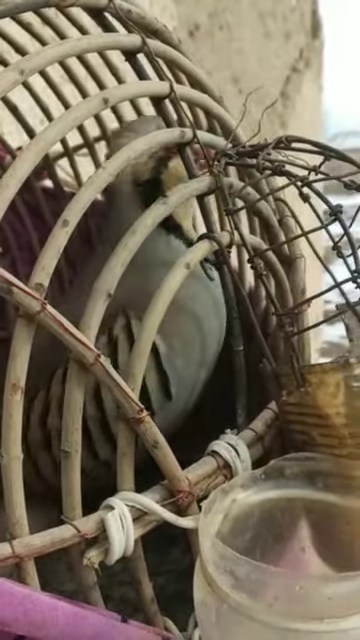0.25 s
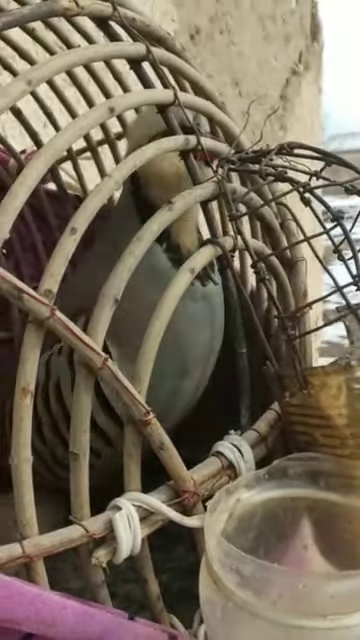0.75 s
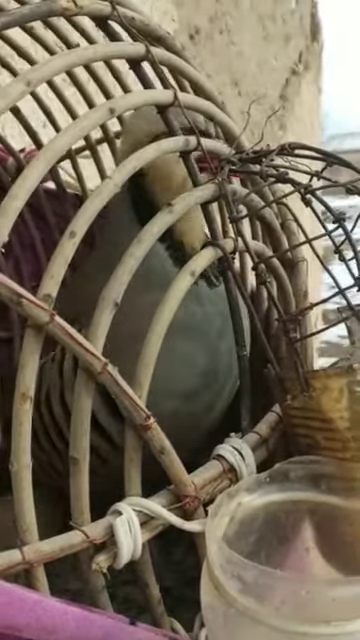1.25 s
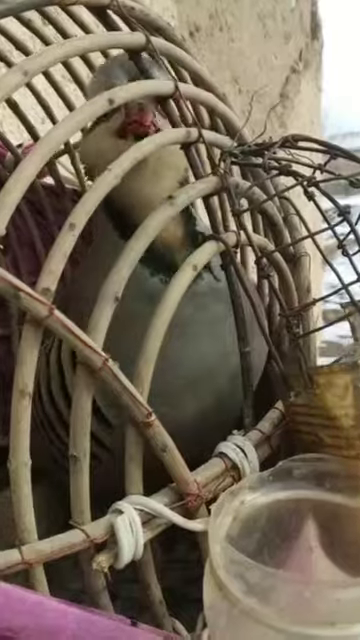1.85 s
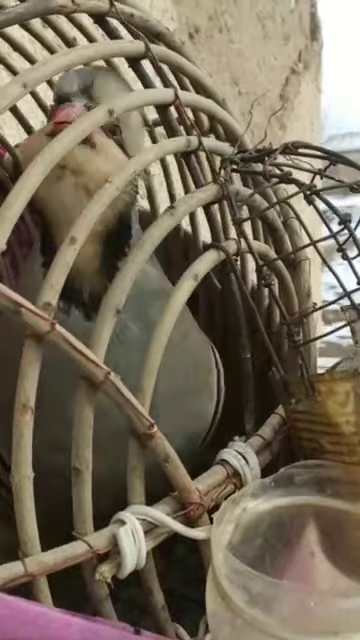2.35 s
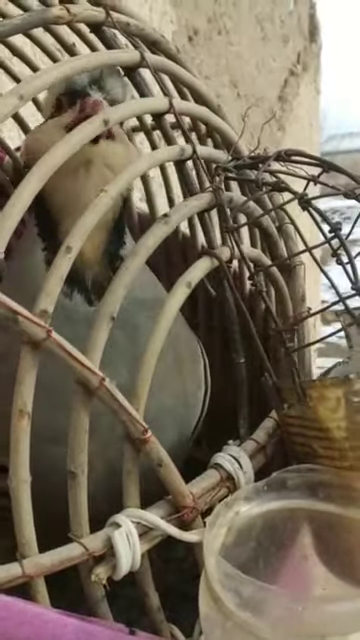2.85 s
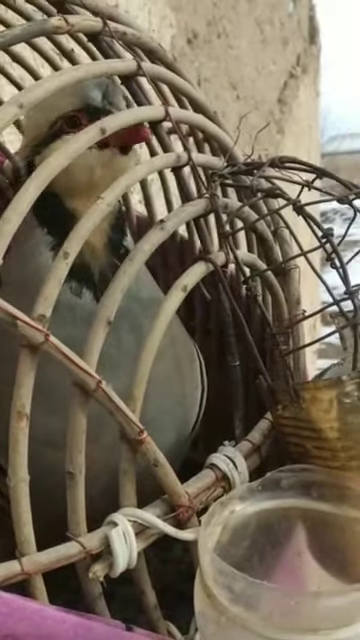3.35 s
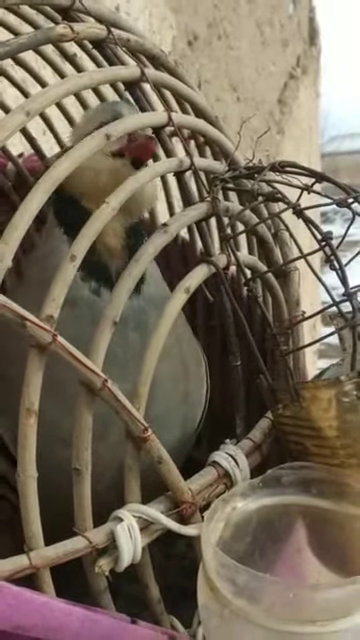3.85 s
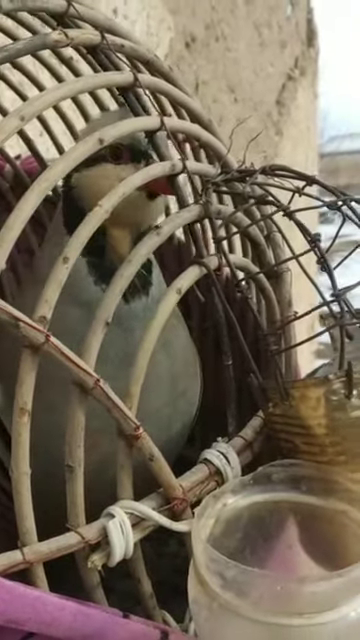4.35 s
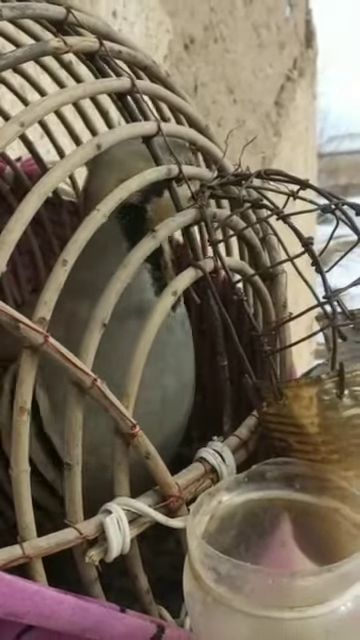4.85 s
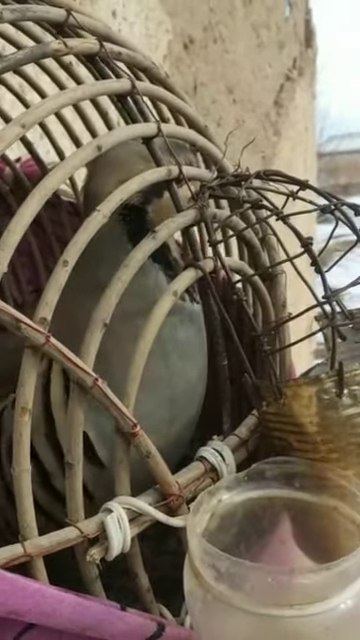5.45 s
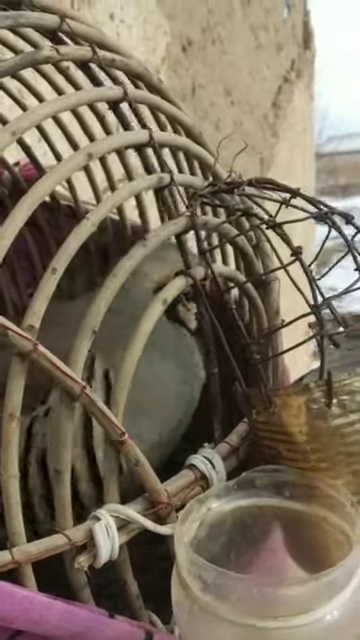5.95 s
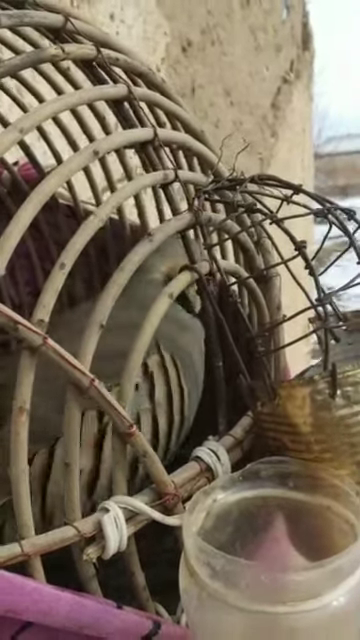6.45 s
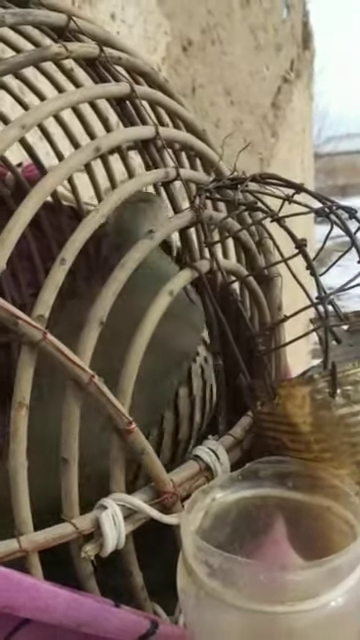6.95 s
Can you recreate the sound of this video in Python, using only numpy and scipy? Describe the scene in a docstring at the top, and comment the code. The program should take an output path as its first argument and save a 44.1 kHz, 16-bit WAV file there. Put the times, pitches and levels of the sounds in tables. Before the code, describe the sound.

Very close, a chukar partridge in a wicker cage rattles out quick hollow chucks in a galloping rhythm, with softer breathy murmurs between. After about three seconds the notes turn hoarse and sparser, then break upward into eight short, harsh, two-toned squeals, each dropping into an airy rasp. The later ones weaken slightly. Dry close stereo sound, faint yard echo, low quiet outdoor hush.

```python
"""Beside a wall outdoors, a chukar partridge calls in a wicker cage close to a pair of microphones.
A fast run of hollow chucks and soft murmurs turns into hoarse rasps, which break upward into
two-voiced squeals and then ease off. Uneven pulses and puffs through a moving throat resonance make
the single-voiced notes; two coupled tones make the squeals, gliding harmonics the faint whistles.
Scattered treble, a short tail and steady filtered noise make the cage, the yard and the outdoors."""
import sys
import numpy as np
from scipy import signal
from scipy.fft import rfft, irfft
from scipy.io import wavfile
from scipy.ndimage import uniform_filter1d, map_coordinates

SR = 44100
rng = np.random.default_rng(int(sys.argv[2]) if len(sys.argv) > 2 else 0)


def int16_out(signal):
    """Quantize to a 16-bit WAV file."""
    q = np.round(np.clip(np.atleast_2d(signal).T, -1, 1) * 32767)
    wavfile.write(sys.argv[1], SR, q.astype(np.int16))


N = 317520

EDGE_HZ = 15950  # upper band limit
BINS_HZ = np.fft.rfftfreq(2048, 1 / SR)

# Throat colour of tuks and chucks. Each row: frequency in Hz, gain in dB.
CHUCK_THROAT = [(200, -14), (330, -6.5), (500, -4.5), (900, -1), (1500, 1.5), (2300, -14.5), (2900, -12),
                (3550, -28), (4500, -13), (5500, -6), (6700, -30), (9500, -28.5), (12000, -28.5),
                (15500, -27.5)]
# Throat colour of rasps, also around squeals. Each row: frequency in Hz, gain in dB.
RASP_THROAT = [(200, -16), (330, -10), (500, -5), (900, -1.5), (1500, -5), (2300, -4), (2900, -1),
               (3600, -3), (4500, -6.5), (5500, -10), (6700, -14.5), (9500, -35), (12000, -34),
               (15500, -40)]
# Squeals. Each row: start in seconds, length in seconds, pitch the lower and the upper voice climb
# towards in Hz, level in dB, treble in dB, air in dB, lead-in in seconds, lead-in level in dB, tail level in dB.
SQUEALS = [(4.113, 0.058, 2000, 2875, -16.5, 3.5, -19, 0.02, -18, -21.5),
           (4.406, 0.073, 2044, 2920, -14, 4.5, -14, 0.024, -18.5, -20),
           (4.782, 0.068, 2197, 3163, -19, 6, -11, .014, -19.5, -24),
           (5.234, 0.085, 2045, 2960, -12.5, 7, -14.5, .013, -18.5, -21.5),
           (5.646, 0.063, 2142, 3080, -13, 9, -13, 0.014, -17, -22),
           (6.016, .108, 2357, 3295, -17, -11.5, 8, 0.0087, -24.5, -26),
           (6.463, 0.085, 2381, 3346, -17.5, -7, 1, 0.0083, -25, -28.5),
           (6.826, 0.08, 2464, 3370, -19, 14.5, -13.5, 0.0086, -21.5, -26)]


def amp(db):
    """Decibels to gain."""
    return 10 ** (np.asarray(db) / 20)


def evened(x):
    """Scales to rms 1."""
    return x / np.sqrt(np.mean(x ** 2) + 1e-20)


def read(points, hz):
    """Interpolates a spectrum on a log-frequency axis."""
    points_hz, value = np.transpose(points)
    return np.interp(np.log(hz + 1), np.log(points_hz + 1), value)


def contour(values, t):
    """Straight lines through values spread evenly over a note."""
    return np.interp(t, np.linspace(0, t[-1], len(values)), values)


def waver(t, cutoff_hz):
    """Random motion, low-passed at cutoff_hz; rms 1 over a quarter second, cut to the note."""
    hz = np.fft.rfftfreq(SR // 4, 1 / SR)
    spectrum = rfft(rng.standard_normal(SR // 4)) / (1 + (hz / cutoff_hz) ** 4)
    return evened(irfft(spectrum))[:len(t)]


def air_puffs(envelope):
    """Turbulent noise of rms 1, shaped by the airflow envelope."""
    return evened(envelope * rng.standard_normal(SR // 4)[:len(envelope)])


def add(mix, start_s, sound):
    """Lays a sound into the mix."""
    part = mix[max(round(start_s * SR), 0):][:len(sound)]
    part += sound[:len(part)]


def shelf(from_hz, to_hz):
    """Rises from 0 to 1 between two frequencies."""
    return np.interp(BINS_HZ, [from_hz, to_hz], [0, 1])


def resonance(centre_hz, width_hz):
    """One peak of height 1, down to half at width_hz from its centre."""
    return 1 / (1 + ((BINS_HZ - centre_hz) / width_hz) ** 2)


def tract(x, gain_db):
    """A causal minimum-phase filter with this gain, so that resonances ring after each pulse."""
    log_gain = np.log(amp(np.r_[gain_db, gain_db[-2:0:-1]]))
    ring = np.fft.ifft(np.exp(np.conj(signal.hilbert(log_gain)))).real
    return signal.fftconvolve(x, ring[:len(BINS_HZ)])[:len(x)]


def swell(x, t, level_db, crest, rise_db, fade_db, attack_s, release_s):
    """Effort: loudness rises by rise_db to a crest (share of the length), then loses fade_db."""
    power = uniform_filter1d(uniform_filter1d(x ** 2, size=600), size=400)
    gate = np.clip(np.minimum(t / attack_s, (t[-1] - t) / release_s), 0, 1)
    gate = np.sin(np.pi / 2 * gate) ** 2  # rounded corners
    past = t / t[-1] - crest
    rising_db = rise_db * (past / crest) ** 2
    fading_db = fade_db * (past / (1 - crest)) ** 2
    below_db = np.where(past < 0, rising_db, fading_db)
    return x / np.sqrt(abs(power) + 1e-12) * amp(level_db - below_db) * gate


def syrinx(t, length_s, pitch_hz, octaves_per_s, bend, jitter, rasp, settle, hiss):
    """Vibrating membranes release uneven pulses and puffs of air, sliding in pitch."""
    bend_s = .009
    rough = 1 + settle * (1 - 2 * t / length_s)  # settle > 0: clears; < 0: grows rougher
    hz = pitch_hz * 2 ** (octaves_per_s * (t - length_s / 2)) * np.exp(jitter * rough * waver(t, 260))
    hz *= 1 + bend * np.exp(-t / bend_s)  # starts off pitch
    turns = np.cumsum(hz) / SR
    k = np.arange(1, int(EDGE_HZ / hz.min()) + 1)[:, None]
    harmonics = np.cos(2 * np.pi * k * turns) * (k * hz < EDGE_HZ)
    pulses = evened(harmonics.sum(0)) * np.exp(rasp * rough * waver(t, 300))  # uneven strength
    puffs = air_puffs(np.exp(-(turns % 1) / .5))
    noise_share = np.clip(hiss * BINS_HZ / 3000, .001, .9)  # of power; hiss is the share at 3 kHz
    return tract(pulses, 10 * np.log10(1 - noise_share)) + tract(puffs, 10 * np.log10(noise_share))


def throat(drive, t, colour_db, throat_hz, peak_db, peak_fade, width_hz, glide, thin_db, dull_db):
    """Air column whose resonance glides in pitch and strength; start, middle and end cross-fade."""
    voice = 0
    for stage, share in zip((1, 0, -1), np.eye(3)):
        height_db = peak_db * (1 + peak_fade * stage)
        peak = height_db * resonance(throat_hz * (1 + glide * stage), width_hz)
        tilt = dull_db * (abs(stage) - .5) * shelf(1800, 4900)  # dull_db < 0: middle brightest
        tilt = tilt - thin_db * stage * (BINS_HZ > 900)  # thin_db < 0: bass fills in late
        voice = voice + contour(share, t) * tract(drive, colour_db + peak + tilt)
    return voice


def notes(rows, colour, effort, source, passage):
    """Single-voiced notes: syrinx into throat, with the beak governing the highest treble."""
    # Beaming by the beak above 6700 Hz. Each row: time in seconds, gain in dB.
    beam = [(0, 0.5), (3, -0.5), (3.5, -3.5), (4, -1.5), (5.8, 2), (6.1, 7), (7.2, 3)]
    out = np.zeros(N)
    for start_s, length_s, pitch_hz, level_db, throat_hz, treble_db in rows:
        t = np.arange(0, length_s, 1 / SR)
        drive = syrinx(t, length_s, pitch_hz, **source)
        colour_db = read(colour, BINS_HZ) + treble_db * shelf(1500, 3000)
        colour_db += np.interp(start_s, *np.transpose(beam)) * (BINS_HZ > 6700)
        # a nearly shut beak holds back the top early on
        colour_db += np.interp(start_s, [3, 4], [-4, 0]) * shelf(9000, 9800)
        voice = throat(drive, t, colour_db, throat_hz, **passage)
        add(out, start_s, swell(voice, t, level_db, **effort))
    return out


def background(spectrum, level_db, apart):
    """Steady noise, mostly shared by the two microphones; apart is the side-to-mid ratio."""
    gain = amp(read(spectrum, np.fft.rfftfreq(N, 1 / SR)))
    mid, side = irfft(rfft(rng.standard_normal((2, N))) * gain, N)
    return amp(level_db) * evened(np.array([mid + apart * side, mid - apart * side]))


def outdoors():
    """Quiet outdoor air: a broad hush and a low rumble, each filtered random noise."""
    # Noise spectra. Each row: frequency in Hz, relative density in dB per Hz.
    hush = [(12, -44.5), (20, -3.5), (70, -29.5), (182, -11), (347, -11.5), (698, -10), (1190, -8),
            (1400, -7.5), (3440, -22.5), (5080, -18.5), (6720, -21), (16000, -44.5)]
    rumble = [(25, 2), (66, -2.5), (120, -12), (170, -24), (700, -37)]
    return background(hush, level_db=-56, apart=0.64) + background(rumble, level_db=-52, apart=0.54)


def tuks():
    """Pulsed notes whose pitch falls slowly, so that it stays clear."""
    # Each row: start in seconds, length in seconds, mid pitch in Hz, level in dB,
    # throat resonance in Hz, treble in dB.
    tuk_rows = [(.012, .05, 487, -15, 1124, -5), (.402, 0.035, 477, -12.5, 1115, -1.5),
                (.503, 0.04, 436, -16, 1250, 4.5), (.827, 0.041, 469.6, -10, 1260, 1),
                (1.209, 0.05, 485.4, -11, 1630, -0.5), (1.571, .038, 460.5, -10.5, 1540, 2),
                (1.673, 0.037, 609, -10.5, 1170, -3), (2.014, 0.033, 459.8, -10.5, 1560, 4.5),
                (2.39, .056, 490, -9.5, 1593, 3.5), (2.73, 0.038, 474.6, -11, 1210, 4.5)]
    effort = dict(crest=0.32, rise_db=11.5, fade_db=12, attack_s=0.0056, release_s=0.0065)
    source = dict(octaves_per_s=-2.5, bend=0.085, jitter=.022, rasp=0.22, settle=0.74, hiss=0.35)
    passage = dict(peak_db=9.5, peak_fade=0.69, width_hz=220, glide=.05, thin_db=-1.5, dull_db=-12)
    return notes(tuk_rows, CHUCK_THROAT, effort, source, passage)


def chucks():
    """Hollow pulsed notes: pitch falls steeply through a strong, narrow throat resonance."""
    # Each row: start in seconds, length in seconds, mid pitch in Hz, level in dB,
    # throat resonance in Hz, treble in dB.
    chuck_rows = [(.108, 0.045, 480.4, -11.5, 1540, -2.5), (.266, 0.045, 436.4, -11.5, 1586, 0),
                  (.53, 0.035, 432.5, -8, 1470, 1.5), (.682, 0.032, 499, -8.5, 1440, 3.5),
                  (.708, 0.038, 409.6, -9.5, 1440, 6.5), (.925, 0.045, 421.7, -8.5, 1363, 4.5),
                  (1.092, 0.044, 480, -8, 1480, 1.5), (1.297, .043, 479, -9, 1500, 0),
                  (1.452, 0.042, 405.6, -10, 1420, 0), (1.699, 0.041, 499, -9, 1465, 6.5),
                  (1.853, 0.03, 545, -8, 1445, -1), (1.877, 0.036, 466.4, -9, 1460, 5.5),
                  (2.111, 0.032, 495, -8.5, 1240, 5), (2.138, 0.034, 346.8, -8, 1420, 1.5),
                  (2.281, 0.038, 418.3, -8, 1500, 1), (2.443, 0.033, 318, -23, 900, -15.5),
                  (2.472, 0.036, 419.7, -9.5, 1370, 8), (2.625, 0.04, 407, -9.5, 1400, 3),
                  (2.842, 0.03, 499.7, -8.5, 1370, -1), (2.866, .03, 329.2, -10, 1310, 1.5),
                  (3.541, 0.026, 528, -33.5, 755, -8)]
    effort = dict(crest=0.26, rise_db=8.5, fade_db=10.5, attack_s=0.0064, release_s=0.0027)
    source = dict(octaves_per_s=-26.5, bend=.25, jitter=.026, rasp=0.39, settle=0.5, hiss=0.42)
    passage = dict(peak_db=19.5, peak_fade=0.055, width_hz=233, glide=0.057, thin_db=-3, dull_db=-9.5)
    return notes(chuck_rows, CHUCK_THROAT, effort, source, passage)


def murmurs():
    """Soft notes in which air puffs outweigh the pulses in the treble."""
    # Each row: start in seconds, length in seconds, mid pitch in Hz, level in dB,
    # throat resonance in Hz, treble in dB.
    murmur_rows = [(.212, 0.069, 637, -24, 1700, 6), (.375, 0.077, 659, -24.5, 1440, 12),
                   (.48, 0.099, 627, -20, 1290, 7.4), (.667, 0.049, 803, -21.5, 1700, 7.2),
                   (1.12, 0.072, 735, -18.5, 1540, 11.4), (1.395, 0.056, 557, -22.5, 1420, 16.4),
                   (1.606, 0.075, 672, -18.5, 1560, 12), (1.788, 0.061, 597, -23.5, 1450, 19.4),
                   (1.906, 0.055, 513, -22.5, 1410, 8.6), (2.09, 0.042, 540, -27, 1590, 10),
                   (2.269, 0.017, 742, -21.5, 1650, 15), (2.575, 0.098, 613, -23, 1560, 9),
                   (2.767, 0.079, 649, -35, 880, 14), (2.897, 0.08, 586, -28.5, 1350, 10.4),
                   (3.095, 0.1, 533, -20.5, 1540, 12.4), (3.298, 0.061, 648, -27.5, 1390, 15.8),
                   (3.631, 0.048, 729, -19.5, 1610, 2.3), (3.962, 0.093, 514.4, -23.5, 1550, 6.7),
                   (4.2, 0.069, 507, -27, 1510, 7), (4.25, 0.076, 774, -20.5, 1480, 4.8),
                   (4.6, 0.064, 485, -21, 1377, 6), (4.868, 0.065, 722, -19.5, 1630, 6.5),
                   (5.073, 0.058, 597, -30.5, 1540, 12), (5.197, 0.061, 530, -38.5, 1430, 12),
                   (5.495, 0.063, 513, -25, 1490, 8.4), (5.848, 0.07, 702, -39.5, 1220, 23.5)]
    # Throat colour. Each row: frequency in Hz, gain in dB.
    colour = [(200, -7.5), (330, -1), (500, 0.5), (900, -3), (1500, 3.5), (2300, -19), (2900, -12),
              (3600, -20.5), (4500, -15.5), (5500, -10), (6700, -23.5), (9500, -29), (12000, -32),
              (15500, -32)]
    effort = dict(crest=0.23, rise_db=11, fade_db=25.5, attack_s=0.01, release_s=0.0018)
    source = dict(octaves_per_s=-2.5, bend=.06, jitter=.045, rasp=.14, settle=.2, hiss=0.86)
    passage = dict(peak_db=20, peak_fade=.15, width_hz=500, glide=0.079, thin_db=-2.5, dull_db=6.0)
    return notes(murmur_rows, colour, effort, source, passage)


def rasps():
    """Hoarse rising notes: pulses of very unequal strength and pitch, growing rougher."""
    # Each row: start in seconds, length in seconds, mid pitch in Hz, level in dB,
    # throat resonance in Hz, treble in dB.
    rasp_rows = [(3.05, .036, 1164, -11.5, 1180, -10.5), (3.138, .028, 1012, -19.5, 1100, -12.5),
                 (3.155, 0.058, 713, -16.5, 915, 12), (3.422, 0.071, 785, -25, 850, 1.5),
                 (3.452, 0.045, 613.5, -19.5, 1375, 4), (3.65, 0.049, 771, -18, 1390, 1.5),
                 (3.71, 0.035, 604, -22, 1310, 0.5), (3.82, 0.062, 637.5, -19.5, 1250, 1.5),
                 (3.92, 0.038, 667, -24, 1210, 0), (4.582, 0.024, 643, -25, 1360, -8.5),
                 (4.99, .046, 691, -23.5, 1380, -7.5), (5.398, .058, 605, -25.5, 1210, -2.5),
                 (5.814, 0.037, 561, -25, 1500, -6.5), (6.228, 0.055, 652, -29.5, 1830, -13),
                 (6.695, .072, 702, -38.5, 1090, 8), (7.018, 0.056, 650, -30.5, 1380, -2)]
    effort = dict(crest=0.52, rise_db=11.5, fade_db=11, attack_s=0.008, release_s=0.0034)
    source = dict(octaves_per_s=5.4, bend=-.12, jitter=0.06, rasp=0.42, settle=-0.63, hiss=.5)
    passage = dict(peak_db=10, peak_fade=0.25, width_hz=590, glide=0.013, thin_db=-1.5, dull_db=-7.5)
    return notes(rasp_rows, RASP_THROAT, effort, source, passage)


def squeal_leads():
    """Rising rasps that break into the squeals; pitch and throat scale with the lower voice."""
    overlap_s, pitch_share, throat_share, treble_db = .018, .35, 0.76, 3
    rows = []
    for start_s, _, lower_hz, *_, lead_s, lead_db, _ in SQUEALS:
        rows.append((start_s - lead_s, lead_s + overlap_s, pitch_share * lower_hz, lead_db,
                     throat_share * lower_hz, treble_db))
    effort = dict(crest=0.48, rise_db=21.5, fade_db=6.5, attack_s=0.0041, release_s=0.0054)
    source = dict(octaves_per_s=25, bend=-0.088, jitter=0.032, rasp=0.22, settle=-0.44, hiss=0.48)
    passage = dict(peak_db=19, peak_fade=-0.22, width_hz=330, glide=-0.14, thin_db=-2, dull_db=-12)
    return notes(rows, RASP_THROAT, effort, source, passage)


def squeals(coupling=0.82, upper=1.86, jitter=0.027, shimmer=0.28, hiss_db=-14):
    """Both sides of the syrinx sing one arch; each chops the other's airflow: sum and difference tones."""
    # Throat colour. Each row: frequency in Hz, gain in dB.
    colour = [(300, -32), (900, -23), (1400, -6.5), (2000, -8.5), (2650, -4.5), (3200, 2), (3800, 0.5),
              (5000, -6), (6000, -6.5), (7000, -2.5), (8000, -7), (9800, -20.5), (11800, 8), (13500, -1),
              (15500, -8)]
    swoop, swoop_s, droop, droop_s = 0.4, 0.011, 0.257, .011  # shares of the pitch, time constants
    beak_ratio, beak_db, beak_width_hz = 1.96, 5, 900  # the beak resonates higher for higher calls
    effort = dict(crest=0.35, rise_db=10.5, fade_db=18.5, attack_s=0.0099, release_s=0.0033)
    out = np.zeros(N)
    for start_s, length_s, lower_hz, upper_hz, level_db, treble_db, air_db, *_ in SQUEALS:
        t = np.arange(0, length_s, 1 / SR)
        arch = 1 - swoop * np.exp(-t / swoop_s)
        arch *= 1 - droop * np.exp((t - length_s) / droop_s)
        voices = []
        for top_hz in (lower_hz, upper_hz):
            hz = top_hz * arch * (1 + jitter * (waver(t, 280) + .5 * waver(t, 57.6)))
            tone = np.cos(2 * np.pi * np.cumsum(hz) / SR)
            voices.append(tone * (1 + shimmer * waver(t, 100)))
        low, high = voices
        flow = np.exp(coupling * (low + upper * high))
        drive = evened(flow - flow.mean()) + amp(hiss_db) * air_puffs(np.sqrt(flow))
        colour_db = read(colour, BINS_HZ) + treble_db * shelf(3200, 6160) + air_db * shelf(5170, 8600)
        colour_db += beak_db * resonance(beak_ratio * upper_hz, beak_width_hz)
        flutter = amp(2.5 * np.tanh(waver(t, 160)))  # within 2.5 dB either way
        add(out, start_s, swell(tract(drive, colour_db), t, level_db, **effort) * flutter)
    return out


def squeal_tails():
    """Falling, airy rasps into which the squeals drop; pitch and throat scale with the lower voice."""
    length_s, overlap_s, pitch_share, throat_share, treble_db = .053, 0.0043, .32, 0.69, 2.5
    rows = []
    for start_s, squeal_s, lower_hz, *_, tail_db in SQUEALS:
        rows.append((start_s + squeal_s - overlap_s, length_s, pitch_share * lower_hz, tail_db,
                     throat_share * lower_hz, treble_db))
    effort = dict(crest=0.26, rise_db=19, fade_db=13.5, attack_s=0.0099, release_s=0.011)
    source = dict(octaves_per_s=-7, bend=0.24, jitter=0.061, rasp=.37, settle=0.1, hiss=0.82)
    passage = dict(peak_db=14.5, peak_fade=0.1, width_hz=500, glide=0.14, thin_db=0.5, dull_db=-4.5)
    return notes(rows, RASP_THROAT, effort, source, passage)


def whistles(jitter=0.048, overtones_db=(-9, 0, -10)):
    """Faint rising squeaks of unsteady pitch: three harmonics, the second strongest."""
    # Each row: start in seconds, length in seconds, pitch at start and at end in Hz, level in dB.
    whistle_rows = [(6.413, 0.043, 1264, 2300, -38), (6.953, 0.072, 1334, 2450, -40)]
    out = np.zeros(N)
    for start_s, length_s, *pitch_hz, level_db in whistle_rows:
        t = np.arange(0, length_s, 1 / SR)
        hz = contour(pitch_hz, t) * (1 + jitter * waver(t, 560))
        angle = 2 * np.pi * np.cumsum(hz) / SR
        tone = sum(amp(db) * np.sin((k + 1) * angle) for k, db in enumerate(overtones_db))
        shape = np.sin(np.pi * t / length_s) * np.exp(.5 * waver(t, 120))
        add(out, start_s, amp(level_db) * evened(tone * shape))
    return out


def microphones(x):
    """Path differences: the call reaches the left later; the paths change as the bird lowers its head."""
    # Left against right. Each row: frequency in Hz, delay in ms and level in dB with the head high,
    # delay in ms and level in dB with the head low.
    ports = [(435, 0.027, -1, 0.097, -0.5), (950, 0.23, 0.5, 0.16, 1), (1410, 0.1, 0.5, 0.15, 0),
             (2236, 0.15, 4, 0.059, 1), (2906, 0.14, 7, 0.18, 5.5), (4740, 0.24, 2, 0.19, -0.5),
             (5830, 0.22, 7.5, 0.23, 6.5), (7530, 0.29, -5.5, 0.18, -5), (8600, 0.26, 6, 0.13, 6),
             (11100, 0.24, -10.5, 0.14, -7.5), (14970, 0.086, 3.5, 0.12, 1)]
    hz = np.fft.rfftfreq(N, 1 / SR)
    points_hz, *columns = np.transpose(ports)
    sunk = np.interp(np.arange(N) / SR, [4.04, 4.08], [0, 1])
    pair = 0
    for share, (delay_ms, side_db) in zip((1 - sunk, sunk), np.split(np.array(columns), 2)):
        # half the delay and level on the left, the inverse on the right
        late = np.exp(-1j * np.pi * hz * np.interp(hz, points_hz, delay_ms) / 1000)
        left = late * amp(.5 * np.interp(hz, points_hz, side_db))
        pair = pair + share * irfft(rfft(x) * np.array([left, 1 / left]), N)
    return pair


def cage(pair, echo_db=-12, count=6):
    """Thin canes scatter the treble; each path drifts as the head moves, so notches wander."""
    at = np.arange(N)
    treble = signal.sosfilt(signal.butter(1, 2000, "high", fs=SR, output="sos"), pair)
    moments = np.linspace(0, N, 20)
    out = pair.copy()
    for path_ms in np.geomspace(.6, 6, count):
        drift = np.interp(at, moments, rng.standard_normal(len(moments)))
        for channel in (0, 1):
            delay = (path_ms + .07 * drift + .03 * rng.standard_normal()) * SR / 1000  # samples
            out[channel] += amp(echo_db) * map_coordinates(treble[channel], [at - delay], order=1)
    return out


def head_turn(pair):
    """The turning head shifts the level between left and right."""
    # Each row: time in seconds, left minus right in dB.
    turn = [(.1, -3.5), (.7, -1.2), (2, -2), (3.5, -2), (4.199, 0), (5.699, -2.5), (6.202, -1), (7.1, -2.7)]
    lean = amp(np.interp(np.arange(N) / SR, *np.transpose(turn)) / 2)
    return pair * np.array([lean, 1 / lean])


def yard(x, wet_db=-14.5):
    """A faint tail of sparse echoes from wall and yard, dying fastest in the treble."""
    # Each row: frequency in Hz, time to decay by 60 dB in seconds.
    decay = [(200, 0.28), (1400, 0.16), (15000, 0.12)]
    signs = rng.choice([-1., 1.], (2, SR // 2))
    taps = signs * (rng.random((2, SR // 2)) < 2500 / SR)  # 2500 echoes a second on average
    hz, t, z = signal.stft(taps, SR, nperseg=256)
    close_wall = 1 + 2 * np.exp(-t / 0.0016)  # strongest first echoes
    fading = amp(-60 * t / read(decay, hz)[:, None])
    tail = signal.istft(z * fading * close_wall, SR, nperseg=256)[1]
    tail = tail / np.linalg.norm(tail[0])
    return amp(wet_db) * signal.fftconvolve(x[None], tail, axes=1)[:, :N]


def scene():
    """The bird through its cage and yard, over the quiet outdoors."""
    quiet = outdoors()
    bird = tuks() + chucks() + murmurs() + rasps()
    bird += squeal_leads() + squeals() + squeal_tails() + whistles()
    direct = head_turn(cage(microphones(bird)))
    return direct + yard(bird) + quiet


def record(dry):
    """Rounds off loud peaks, then low-passes at the band limit."""
    rounded = dry / (1 + abs(dry) ** 6) ** (1 / 6)
    lowpass = signal.firwin(511, EDGE_HZ, window=("kaiser", 9), fs=SR)
    return signal.oaconvolve(rounded, lowpass[None], "same")


dry = scene()
out = record(dry)
int16_out(out)
```